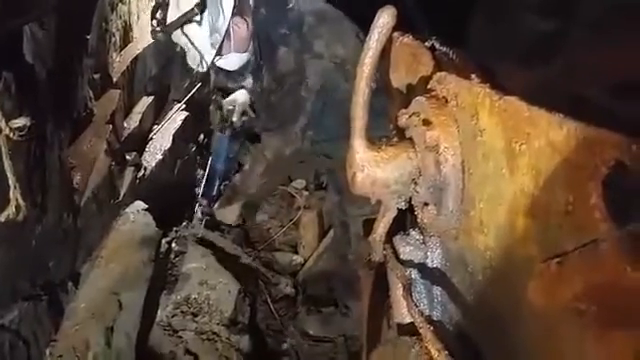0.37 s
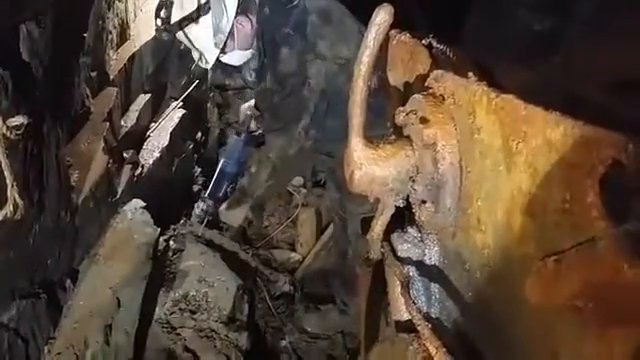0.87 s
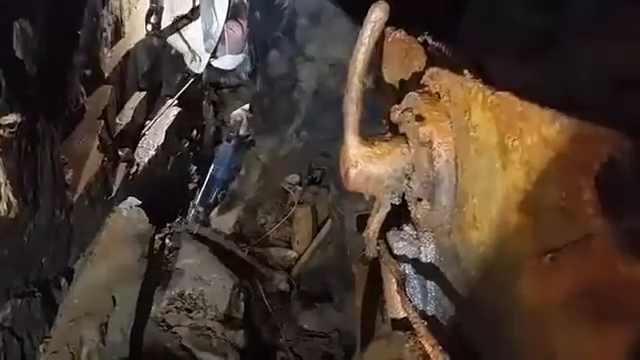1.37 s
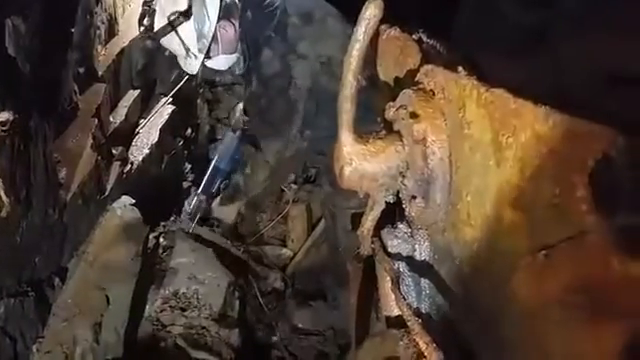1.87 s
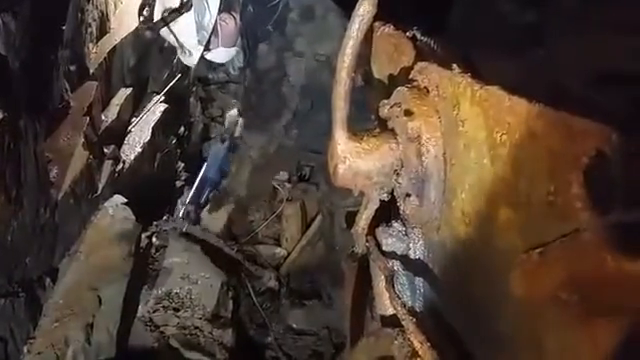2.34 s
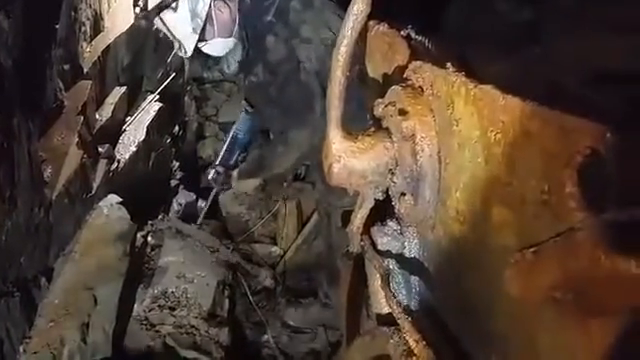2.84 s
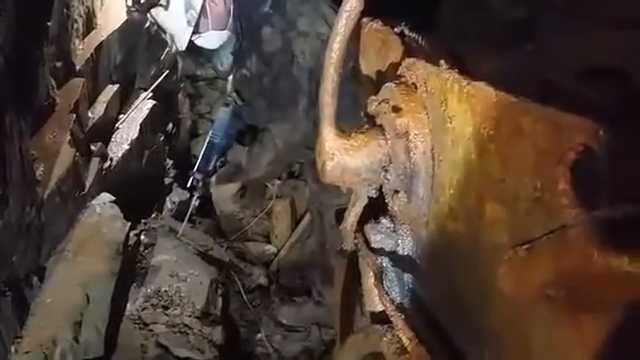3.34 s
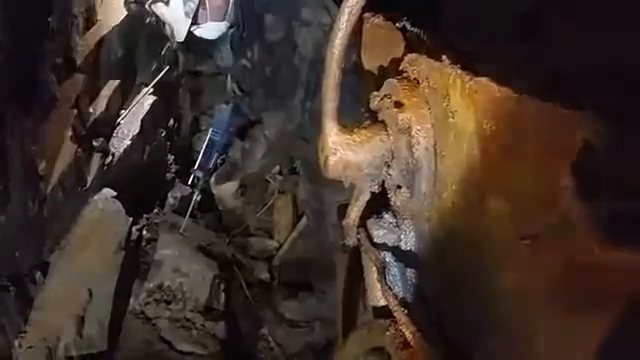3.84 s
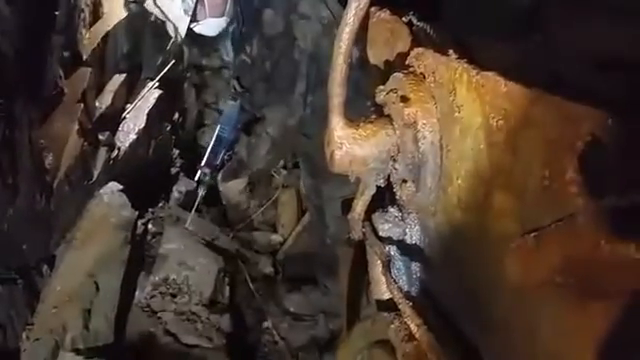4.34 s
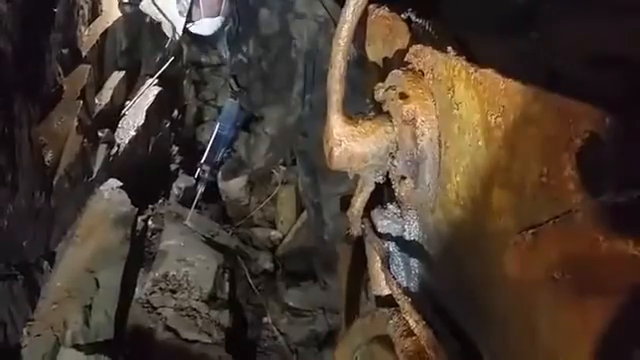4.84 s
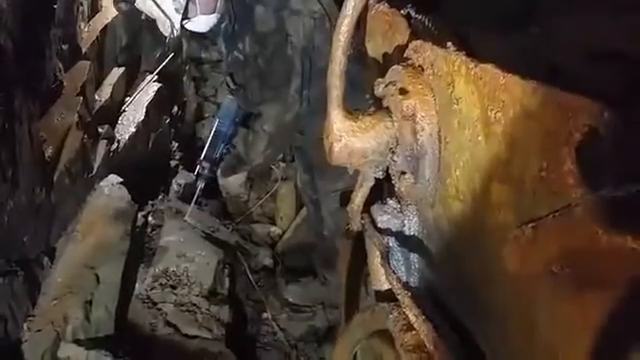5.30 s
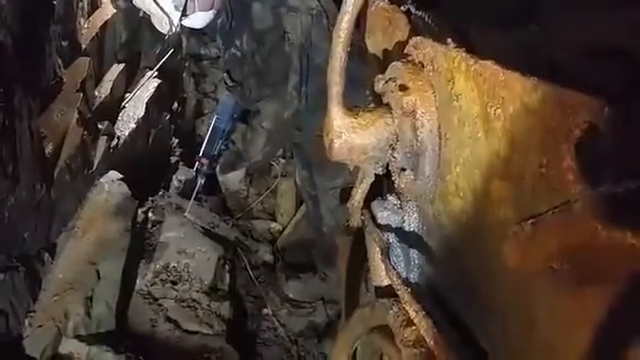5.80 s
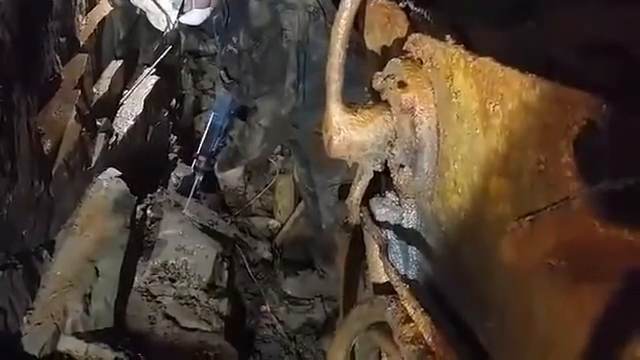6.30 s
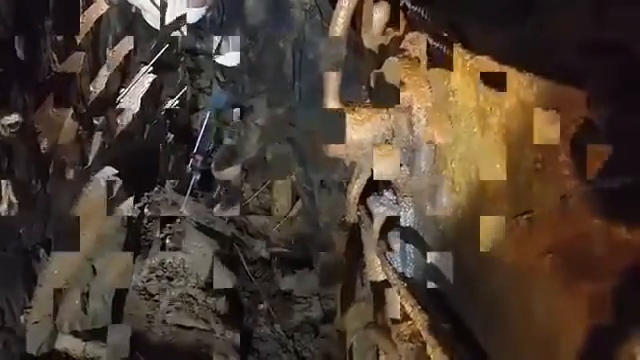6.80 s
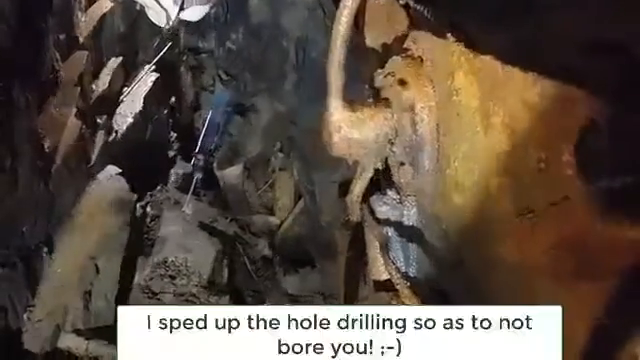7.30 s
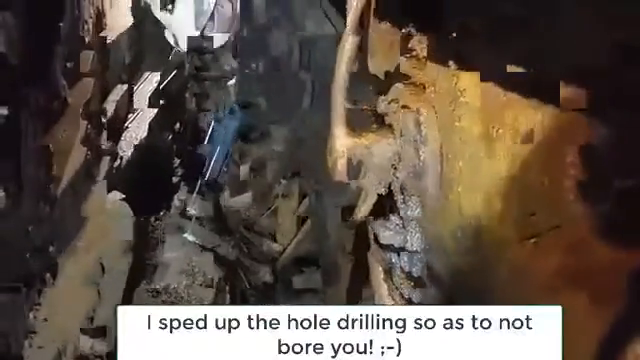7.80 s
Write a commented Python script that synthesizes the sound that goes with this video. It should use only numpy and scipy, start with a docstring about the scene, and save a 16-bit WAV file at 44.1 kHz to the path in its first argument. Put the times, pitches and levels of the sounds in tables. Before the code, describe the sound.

Scraping grit and stone knocks come first, close to a handheld stereo microphone in a small underground hollow with short rock echoes. A hammer drill whirs up, dips, rises and winds down. After light scraping and hard thuds of the bit being placed, it bores at constant speed, whining, rattling and crushing grit, until a sudden end. A low distant machine drone shows in the pauses.

```python
"""Stone scrapes and knocks first, as a corded hammer drill is shifted in a rocky pit; it runs free with a
swooping gear whine, coasts down, is set against the rock and bores at steady speed until an abrupt end.
Gears, armature and blows are harmonic series locked to one crank; rattle, rumble, fan, grit and scraping
are coloured noise; knocks are decaying modes. A far machine hums throughout, plainest in the pauses.
All is heard at a handheld two-port microphone a few metres away."""
import sys
import numpy as np
from scipy import signal
from scipy.fft import rfft, irfft
from scipy.io import wavfile
from scipy.ndimage import uniform_filter1d

SR = 44100
rng = np.random.default_rng(int(sys.argv[2]) if len(sys.argv) > 2 else 0)


def put_to_file(sound):
    """Save the sound as 16-bit audio at rate SR, in the file named by the first command-line argument."""
    columns = np.atleast_2d(sound).T  # one column per channel
    safe = np.clip(columns, -1, 1)
    whole_steps = np.round(safe * 32767)
    wavfile.write(sys.argv[1], SR, whole_steps.astype(np.int16))


def magnitude_from_level(level_db):
    """Linear magnitude for a level in decibels (20 dB per decade)."""
    exponent = np.asarray(level_db, float) / 20
    return 10 ** exponent


N = 359856
T = np.arange(N) / SR
SLOW_T = T[::16]
SIDES = np.array([[1], [-1]])  # left, right

# crank speed running free, trigger eased once: start_s, turns_hz
FREE_SPEED = [(1.2, 16), (1.26, 33.3), (1.3, 42.4), (1.36, 50.5), (1.45, 55.3), (1.72, 57.6), (1.9, 64.8),
              (2.0, 67.4), (2.22, 68.7), (2.33, 49.7), (2.45, 60.2), (2.55, 65.2), (2.63, 67.6),
              (2.8, 45.4), (2.96, 29), (3.25, 8)]
# levels in each run: start_s, rattle_db, then re rattle: casing_rumble_db, crushed_grit_db, gear_whine_db
FREE_LEVELS = [(1.19, -66.5, -3.5, -15, -12), (1.24, -28.5, -12.5, -14, -5.5), (1.32, -20, -14.5, -16, 3),
               (1.47, -19.5, -9, -13, 2), (1.67, -20.5, -11.5, -11.5, 0.5), (1.9, -21.5, -16.5, -15.5, 3),
               (2.18, -20.5, -21, -19, -1.5), (2.33, -24.5, -12, -13.5, 4), (2.5, -23, -16.5, -15, 4),
               (2.63, -22.5, -16, -17, -0.5), (2.88, -27.5, -16, -15, -2), (3.08, -35.5, -20, -22, -24),
               (3.2, -39.5, -12, -15, -28), (3.3, -76, 4, -17, -28)]
BORING_LEVELS = [(3.89, -64, -3.5, -12.5, -28), (3.93, -31.5, -13, -20, -16),
                 (3.96, -23, -11.5, -9.5, -4.5), (4.07, -18.5, -9.5, -2, -3), (4.14, -25.5, -8.5, 2.5, -7),
                 (4.2, -22.5, -7, -2, -1), (4.28, -23.5, -12, -1.5, -2.5), (4.38, -23, -14.5, -1.5, 3),
                 (4.6, -24, -15.5, -3.5, -0.5), (5.4, -25, -15, -6.5, 3.5), (6.2, -25.5, -14.5, -8, 1),
                 (6.7, -25.5, -14, -9, 2.5), (6.92, -23.5, -14.5, -9.5, 2), (7.27, -23.5, -16.5, -7, 0.5),
                 (7.4, -21, -16.5, -7.5, -0.5)]
# the level dips briefly, bell-shaped: centre_s, depth_db, width_s
LEVEL_DIPS = [(1.291, -5, 0.007), (2.35, -3.5, 0.0081), (5.51, -2, 0.012), (5.86, -7, 0.0087)]
# strength added to the armature tones: start_s, gain_db
ARMATURE_GAIN = [(1.2, -11), (1.45, -1), (1.95, 5), (2.3, 0.5), (2.55, 0.5), (2.7, -8.5), (2.95, -27),
                 (3.95, -29), (4.3, -11), (5.0, 0.5), (6.5, 2.5), (7.4, 6)]

# tooth mesh and its sidebands: crank_multiple, level_db (re whine)
MESH_TONES = [(31, -19), (32, -18), (33, -7), (34, -18), (35, -16), (39, -19), (40, -23), (44, -25),
              (51, -25)]
# second multiple of the mesh and its sidebands: crank_multiple, level_db (before UPPER_DB)
UPPER_MESH_TONES = [(64, -20), (65, -23), (66, -13), (67, -25)]
# armature, fan and commutator: rotor_multiple, level_db (before the armature gain)
ROTOR_TONES = [(2, -26), (4, -17), (12, -27), (20, -18)]
# one blow per crank turn as a harmonic series: crank_multiple, level_db (before BLOW_DB)
BLOW_HARMONICS = [(1, -35.5), (2, -16), (3, -11), (4, -6), (5, 0.5), (6, -12.5), (7, -7.5), (8, -10.5),
                  (9, -20.5), (10, -28.5), (11, -12), (12, -6), (13, -6), (14, -20), (15, -20), (16, -19),
                  (17, -1.5), (18, -7), (19, -5), (20, -8.5), (21, -7), (22, -20.5), (23, -17), (24, -10),
                  (25, -1), (26, -12.5), (27, -16.5), (28, -10.5), (29, -6.5), (30, -9)]

# shapes of noise spectra, each scaled to rms 1 when used: frequency_hz, density_db (dB per Hz)
RATTLE_COLOUR = [(350, -48.5), (600, -14), (730, -12), (896, -13.5), (1110, -11), (1610, -9.5), (1980, -6),
                 (2190, -8), (3590, -7.5), (3850, -8.5), (4600, -9.5), (5980, -20), (10100, -120)]
RUMBLE_COLOUR = [(24, -61), (40, -33.5), (187, -17), (227, -6), (282, -8), (439, 3), (513, -2), (558, -9.5),
                 (700, -13.5), (910, -31.5), (1540, -120)]
FAN_COLOUR = [(2590, -36.5), (4400, -5.5), (5270, -0.5), (6240, 2), (8490, -11), (11000, -10.5),
              (12400, -18.5), (13900, -26.5), (15000, -32)]
CRUSHED_GRIT_COLOUR = [(5000, -30), (8500, -6.5), (12200, -3), (14100, -1), (15000, -4), (15500, -14)]
SCRAPE_COLOUR = [(35, -49.5), (60, -12), (193, -8), (237, 8.5), (281, -9.5), (422, 3.5), (586, -2.5),
                 (740, 1.5), (2500, -6), (3250, -32), (5500, -120)]
SCRAPE_GRIT_COLOUR = [(1470, -27), (2500, -3), (5320, -4), (11400, -18), (13400, -16), (15500, -21)]
FAR_COLOUR = [(18, -48.5), (30, -22.5), (234, -2.5), (304, -10), (364, -1), (460, -13.5), (680, -9.5),
              (3590, -40), (6360, -25), (15000, -36.5)]

# tool and feet scraping loose stone: loudest_s, level_db, rise_s, fall_s (over 20 dB), treble_db (re scrape)
SCRAPE_MOVES = [(.016, -35, 0.022, 0.18, -2), (.114, -40, .5, 0.087, -4), (.43, -50, .12, 0.32, -3.5),
                (.7, -37.5, .09, 0.087, -3.5), (.876, -33, .11, 0.089, -3.5), (1.22, -53.5, .15, .02, -2),
                (3.24, -48, .02, .05, -6), (3.29, -51.5, .01, 0.16, -12),
                (3.464, -46.5, .004, 0.082, -12.5), (3.76, -44, .008, 0.13, -7.5),
                (3.92, -46, 0.042, .02, 2)]
# stones, bit and trigger knocking: start_s, thud_db (peak), crack_db (noise before its low-pass),
# crack_ring_s (over 60 dB), crack_top_hz
KNOCK_EVENTS = [(.347, -46, -50, .06, 2500), (.517, -56, -48, .03, 14000), (.874, -32, -39, 0.052, 12000),
                (1.212, -53, -37, .12, 14000), (3.29, -37.5, -52, 0.11, 1500), (3.31, -46, -58, .1, 1500),
                (3.463, -56, -42, .13, 2500), (3.758, -29, -43, 0.136, 5000), (3.785, -33, -56, .1, 3000),
                (3.81, -37.5, -58, 0.09, 3000), (3.862, -45, -43, 0.11, 14000),
                (3.906, -41, -38.5, .12, 14000)]
# modes of the tool against stone: centre_hz, level_db (re one another), ring_s (over 60 dB)
BODY_MODES = [(168.8, -10.5, .2), (240, -0.5, 0.29), (330, 2.5, 0.19), (457, 5, 0.1), (595, -7, .1),
              (820, -16, .08)]
# the far machine's hum lines: frequency_hz, level_db (about which each wavers)
HUM_LINES = [(86.1, -69), (220.7, -63), (360.7, -62), (527.6, -74.5)]

# left-right likeness of diffuse sound: frequency_hz, correlation (0-1)
PORT_LIKENESS = [(20, 0.71), (60, 0.97), (300, 0.95), (640, 0.49), (1400, .12), (3000, .02), (15000, .01)]
# level difference of the ports: frequency_hz, left_minus_right_db
PORT_LEAN = [(60, -0.5), (110, 2.5), (200, -1.5), (380, 0.5), (700, -1), (1290, -2.5), (2380, -1),
             (4400, 2.5), (8120, 1.5), (15000, -1)]
# phase difference of the drill tones: frequency_hz, left_lead_rad
TONE_LEAD = [(300, .25), (1000, 0.47), (2000, 1), (4000, 1.7), (6500, 1.1)]
LEFT_LAG_S = -0.00013  # of the shared diffuse sound; negative: the left port leads

GEAR_TEETH, PINION_TEETH = 33, 7
CHUCK_RATIO = 4.5  # crank turns per turn of the bit
# boring: the trigger is pulled, then the crank nears its loaded speed with two time constants
PULL_S, BORING_HZ, QUICK_S, SLOW_S, QUICK_SHARE = 3.885, 59.42, .035, .13, .55
SPEED_WANDER = .001  # share of the boring speed
BITE_S, SEAT_S = 3.98, .3  # the bit meets the rock, then seats with this time constant

# what the seated bit changes: (running free, boring)
CHATTER = (.65, .1)  # loose teeth, 0-1, before surge and slack add to it
HAMMER_DB = (-15.5, 0)
UPPER_DB = (4, 3.5)  # added to the upper mesh table
THIRD_DB = (-14, -24)  # third multiple of the mesh re whine
FAN_DB, FAN_DB_PER_OCTAVE = (-0.5, -3.5), 2  # re rattle at boring speed; rise with crank speed

BLOW_DB = -13.5
SURGE_CHATTER_S = .11  # more loose teeth per relative change of speed a second
SLACK_HZ = 30  # around and under this crank speed the teeth only rattle and the blows fade
CHATTER_HZ = 50  # rate of the blur at the mesh tone
WAVER = .22  # slow wander of each tone, share of its size

SETTLING_DB = -63  # loose stone that never quite rests
FAR_DB = -56  # middle of the soft floor's slow wander
PIT_T60_S, PIT_DB = .2, -7  # echo decay over 60 dB; echo re direct sound
TOP_HZ = 14900
END_S, END_FADE_S = 7.369, 0.0071


def over_hz(table, hz):
    """Interpolation on a log-frequency axis, the natural axis of a spectrum."""
    at, value = np.transpose(table)
    return np.interp(np.log(np.maximum(hz, 1)), np.log(at), value)


def over_time(*tables):
    """Piecewise-linear envelopes: an on/off gate that is silent between tables, then each column."""
    rows = np.concatenate(tables)
    inside = sum((T >= table[0][0]) & (T <= table[-1][0]) for table in tables)
    gate = uniform_filter1d(1. * inside, size=600)
    return [gate] + [np.interp(T, rows[:, 0], column) for column in rows.T[1:]]


def walk(rate, count=1, at=T):
    """Band-limited chance: smoothed noise with about rate new values a second, spread about 1."""
    knots = np.arange(0, N / SR + 1, 1 / (4 * rate))
    values = 2 * uniform_filter1d(rng.standard_normal((count, len(knots))), size=4)
    return np.array([np.interp(at, knots, row) for row in values])


def diffuse(colour):
    """Diffuse field: the ports hear alike in the bass, unrelated noise in the treble; rms 1."""
    hz = np.fft.rfftfreq(N, 1 / SR)
    like = np.clip(over_hz(PORT_LIKENESS, hz), 0, 1)
    shared, left, right = rfft(rng.standard_normal((3, N)))
    lag = np.exp(-1j * np.pi * hz * LEFT_LAG_S * SIDES)
    ports = np.sqrt(like) * shared * lag + np.sqrt(1 - like) * np.array([left, right])
    level_db = over_hz(colour, hz) + SIDES * over_hz(PORT_LEAN, hz) / 2
    x = irfft(ports * magnitude_from_level(level_db), N)
    return x / np.sqrt(np.mean(x.mean(axis=0) ** 2))


def tones(turns, hz, chatter, table, ratio, rate):
    """Shaft-locked harmonics: a shaking grip makes each waver at each port, loose teeth blur it quickly."""
    out = np.zeros((2, N))
    slow_hz = hz[::16] * ratio
    loose = np.clip(chatter[::16], 0, 1)
    for order, db in table:
        order = round(order)
        tone_hz = order * slow_hz
        apart = np.sqrt(1 - np.clip(over_hz(PORT_LIKENESS, tone_hz), 0, 1))
        both, left, right = WAVER * (walk(rate, 3, SLOW_T) + 1j * walk(rate, 3, SLOW_T))
        blur_rate = CHATTER_HZ * order * ratio / GEAR_TEETH
        blur = np.array([1, 1j]) @ walk(blur_rate, 2, SLOW_T) / np.sqrt(2)
        size = 1 + both + apart * np.array([left, right])
        size = size * (np.sqrt(1 - loose ** 2) + loose * blur)
        size = size * magnitude_from_level(db + SIDES * over_hz(PORT_LEAN, tone_hz) / 2)
        size = size * np.exp(.5j * over_hz(TONE_LEAD, tone_hz) * SIDES)
        carrier = np.sqrt(2) * np.exp(2j * np.pi * (order * ratio * turns + rng.random()))
        out += [np.real(carrier * np.interp(T, SLOW_T, port)) for port in size]
    return out


def crank_speed():
    """Motor run-up: a tabled free run, then an exponential approach to the loaded speed."""
    since = np.maximum(T - PULL_S, 0)
    lack = QUICK_SHARE * np.exp(-since / QUICK_S) + (1 - QUICK_SHARE) * np.exp(-since / SLOW_S)
    boring_hz = BORING_HZ * (1 - lack) * (1 + SPEED_WANDER * walk(4.)[0])
    return np.maximum(np.where(T < PULL_S, over_time(FREE_SPEED)[1], boring_hz), 8)


def with_load(pair, seated):
    """Loading: a setting moves from its free to its boring value as the bit seats."""
    return pair[0] + (pair[1] - pair[0]) * seated


def gear_whine(turns, hz, chatter, seated):
    """Gear mesh: teeth meet at the tooth count times the crank speed, with multiples and sidebands."""
    mesh = tones(turns, hz, chatter, MESH_TONES, 1, 9.)
    upper = tones(turns, hz, chatter, UPPER_MESH_TONES, 1, 12.)
    third = tones(turns, hz, chatter, [(3 * GEAR_TEETH, 0)], 1, 12.)
    return mesh + magnitude_from_level(with_load(UPPER_DB, seated)) * upper + magnitude_from_level(with_load(THIRD_DB, seated)) * third


def armature_tones(turns, hz, chatter):
    """Rotor harmonics: the armature turns faster than the crank by the ratio of teeth."""
    rotor = tones(turns, hz, chatter, ROTOR_TONES, GEAR_TEETH / PINION_TEETH, 8.)
    return magnitude_from_level(over_time(ARMATURE_GAIN)[1]) * rotor


def hammer_blows(turns, hz, chatter, hammer_db):
    """Periodic impact: one blow per crank turn gives a harmonic series."""
    return magnitude_from_level(BLOW_DB + hammer_db) * tones(turns, hz, chatter, BLOW_HARMONICS, 1, 4.)


def drill_noise(turns, hz, seated, hammer_db, rumble_db, grit_db):
    """Modulated noise: rattle, fan rush and grit throb with the crank, casing rumble with the bit."""
    # the bit meets harder and softer stone once a turn
    bit = 1 + .3 * np.cos(2 * np.pi * turns / CHUCK_RATIO)
    throb = 1 + 0.14 * magnitude_from_level(hammer_db) * np.cos(2 * np.pi * turns)
    fan_db = with_load(FAN_DB, seated) + FAN_DB_PER_OCTAVE * np.log2(hz / BORING_HZ)
    # the whole tool shakes in the grip; each noise also flickers alone
    shake = magnitude_from_level(0.78 * walk(12.))
    flicker = shake * magnitude_from_level(np.array([[.8], [1.3], [1.2], [2.2]]) * walk(18., count=4))
    # chips break in quick grains
    grains = magnitude_from_level(1.51 * walk(400., count=2))
    rattle = flicker[0] * throb * grains[0] * diffuse(RATTLE_COLOUR)
    rumble = flicker[1] * bit * magnitude_from_level(rumble_db) * diffuse(RUMBLE_COLOUR)
    fan = flicker[2] * throb * magnitude_from_level(fan_db) * diffuse(FAN_COLOUR)
    grit = flicker[3] * throb * grains[1] * magnitude_from_level(grit_db) * diffuse(CRUSHED_GRIT_COLOUR)
    return rattle + rumble + fan + grit


def drill():
    """Common drive: one crank speed and load govern all tones and noises; returns (tones, noise)."""
    hz = crank_speed()
    turns = np.cumsum(hz) / SR
    gate, rattle_db, rumble_db, grit_db, whine_db = over_time(FREE_LEVELS, BORING_LEVELS)
    rattle_db = rattle_db + sum(db * np.exp(-((T - s) / width) ** 2) for s, db, width in LEVEL_DIPS)
    seated = 1 - np.exp(-np.maximum(T - BITE_S, 0) / SEAT_S)
    slack = 1 / (1 + (hz / SLACK_HZ) ** 6)
    surge = uniform_filter1d(np.abs(np.gradient(np.log(hz))) * SR, size=2000)
    chatter = np.minimum(with_load(CHATTER, seated) + SURGE_CHATTER_S * surge + slack, .95)
    hammer_db = with_load(HAMMER_DB, seated) - 25 * slack
    lines = magnitude_from_level(whine_db) * gear_whine(turns, hz, chatter, seated)
    lines = lines + armature_tones(turns, hz, chatter) + hammer_blows(turns, hz, chatter, hammer_db)
    noise = drill_noise(turns, hz, seated, hammer_db, rumble_db, grit_db)
    level = gate * magnitude_from_level(rattle_db)
    return level * lines, level * noise


def stone_scraping():
    """Stick-slip friction: noise roughened by quick slips, swelling and fading with each move."""
    power = np.full((2, N), magnitude_from_level(SETTLING_DB) ** 2) * [[1], [.3]]  # scrape, treble grit
    for s, db, rise_s, fall_s, treble_db in SCRAPE_MOVES:
        fade_db = -20 * np.where(T < s, (s - T) / rise_s, (T - s) / fall_s)
        power = power + magnitude_from_level(db + fade_db) ** 2 * [[1], [magnitude_from_level(treble_db) ** 2]]
    size = np.sqrt(power) * magnitude_from_level(1.5 * walk(90., count=2))
    return size[0] * diffuse(SCRAPE_COLOUR) + size[1] * diffuse(SCRAPE_GRIT_COLOUR)


def knocks():
    """Impact excitation: each knock rings low modes, a little differently, and sprays a short crack."""
    out, t = np.zeros(N), T[:SR // 4]
    for s, thud_db, crack_db, ring_s, top_hz in KNOCK_EVENTS:
        thud = np.zeros(len(t))
        for hz, db, t60 in BODY_MODES:
            mode_hz = hz * (1 + 0.056 * rng.standard_normal())
            thud += magnitude_from_level(db - 60 * t / max(t60, .02)) * np.sin(2 * np.pi * mode_hz * t)
        thud = magnitude_from_level(thud_db) * thud / np.abs(thud).max()
        spray = signal.lfilter(*signal.butter(2, top_hz, fs=SR), rng.standard_normal(len(t)))
        crack = magnitude_from_level(crack_db - 60 * t / max(ring_s, .01)) * spray
        out[int(s * SR):][:len(t)] += thud + crack
    return out


def pit(x):
    """Reverberation: a short scattered echo of the rock walls ripples the colour of what passes it."""
    t = T[:int(PIT_T60_S * SR)]
    echo = diffuse([(50, 4.0), (5000, -5.5)])[:, :len(t)] * magnitude_from_level(-60 * t / PIT_T60_S)
    echo = echo * magnitude_from_level(PIT_DB) / np.sqrt(np.sum(echo ** 2) / 2)
    return (x + signal.fftconvolve(x, echo, axes=1)[:, :N]) / np.hypot(1, magnitude_from_level(PIT_DB))


def far_machine():
    """Steady rotation afar: hum lines of wavering level over a soft noise floor."""
    hum = 0
    for hz, db in HUM_LINES:
        hum = hum + magnitude_from_level(db + 2.9 * walk(10.0)) * np.sqrt(2) * np.sin(2 * np.pi * hz * T)
    return hum + magnitude_from_level(FAR_DB + 1.2 * walk(5.6)) * diffuse(FAR_COLOUR)


def scene():
    """Superposition at the two ports; the drill tones carry the echo in their wavering."""
    lines, noise = drill()
    return lines + pit(noise + stone_scraping() + knocks()) + far_machine()


def top_cut(x):
    """Nothing passes above the cut-off."""
    return signal.sosfilt(signal.butter(12, 16020, fs=SR, output="sos"), x)


def record(dry):
    """Saturation and band limiting: peaks are rounded, the top is cut, the end fades in milliseconds."""
    rounded = np.tanh(dry)
    low_pass = signal.ellip(8, .2, 70, TOP_HZ, fs=SR, output="sos")
    mix = signal.sosfilt(low_pass, rounded) * np.clip((END_S - T) / END_FADE_S, 0, 1)
    return top_cut(mix)


dry = scene()
out = record(dry)
put_to_file(out)
```